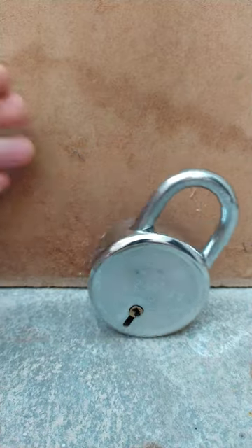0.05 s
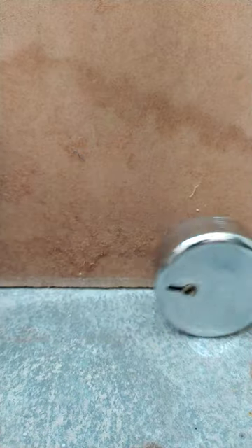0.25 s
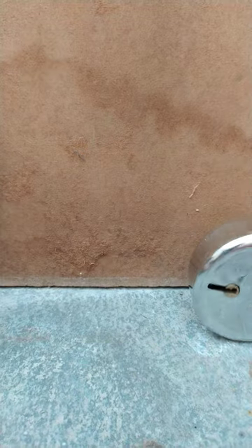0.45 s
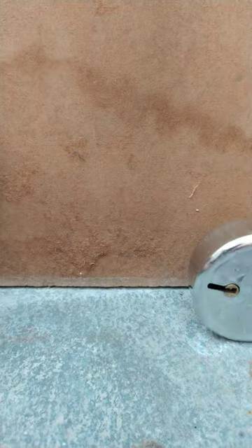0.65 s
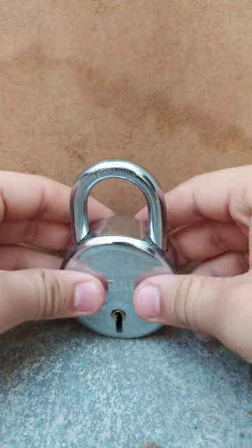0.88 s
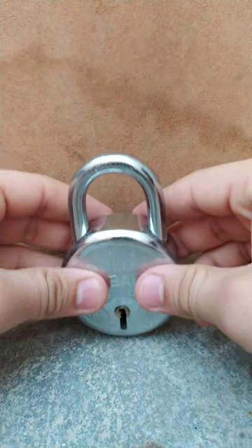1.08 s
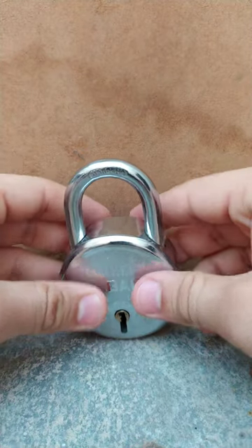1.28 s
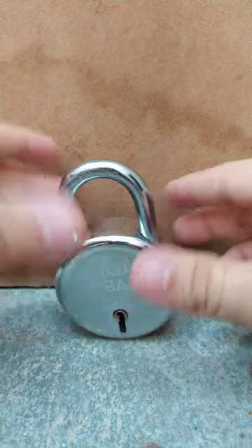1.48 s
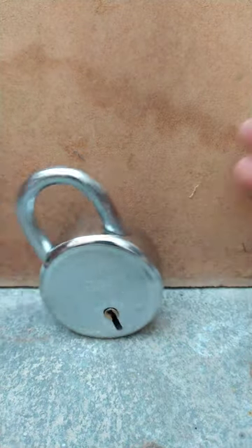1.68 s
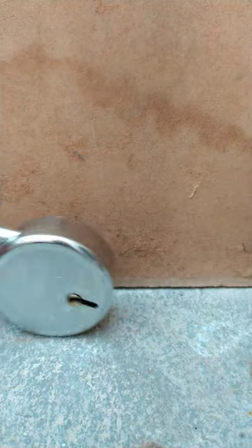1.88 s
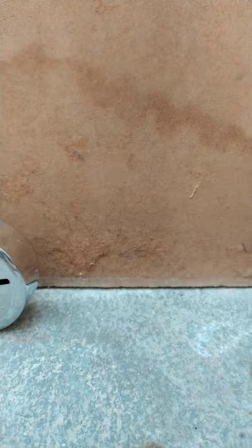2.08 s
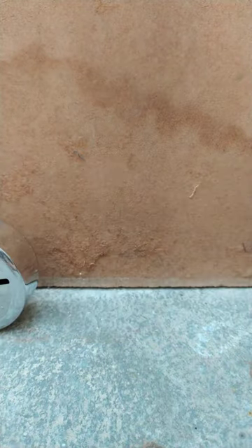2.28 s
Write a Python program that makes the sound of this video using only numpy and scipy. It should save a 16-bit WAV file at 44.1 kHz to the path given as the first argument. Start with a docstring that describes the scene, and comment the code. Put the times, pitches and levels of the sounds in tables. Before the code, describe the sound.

Metal padlock rolling on a stone slab, clacking, bouncing and rocking, close up.

```python
"""A round steel padlock is let go on a stone slab by a wall, close to the microphone.
It rolls over on its rim, and at 0.3 s its shackle (the steel loop) clacks down and bounces.
The lock rocks to rest, and at 1.2 s it is stood up with one firm knock.
From 1.8 s it rolls over again, and the shackle clacks down and bounces once more.
All along, a small hard room echoes over a quiet hiss and a low hum."""
import sys
import numpy as np
from scipy import signal
from scipy.fft import rfft, irfft, next_fast_len
from scipy.io import wavfile

SR = 44100
rng = np.random.default_rng(int(sys.argv[2]) if len(sys.argv) > 2 else 0)


def store_wav(level_fs):
    """Save 16-bit WAV to argv[1]."""
    pcm = np.round(np.clip(np.atleast_2d(level_fs), -1, 1) * 32767)
    wavfile.write(sys.argv[1], SR, pcm.T.astype(np.int16))


N = 108045
T = np.arange(N) / SR
FREE_TAIL_DB, HELD_TAIL_DB = -17.5, -28  # hands muffle the tail of a rattle

# hard blows of steel on stone (time [s], thud [dB], clack [dB], click [dB], steel ring [dB],
# rattle length [s], held in the hands [0 or 1], knock pitch [Hz], case pitch [Hz], boom [dB])
STRIKE_ROWS = [(0.3314, -28, -7.5, -3.5, -26, 0.0052, 0, 504, 1107, -8.5),
               (0.357, -15, -11, -6.5, -32.5, 0.0016, 0, 405, 1108, -18.5),
               (0.3658, -15, -14.5, -15.5, -58, 0.0032, 0, 357, 1105, -16.5),
               (1.1811, -13.5, -7.5, -8.5, -57, 0.0062, 1, 372, 1160, -28),
               (1.1842, -13, -16, -32, -33, 0.0021, 1, 309, 923, -9),
               (2.0256, -11, -11, -5, -21, 0.0076, 0, 600, 734, -23.5),
               (2.0556, -42, -20.5, -18.5, -30, 0.0077, 0, 414, 2090, -46),
               (2.0596, -13.5, -9, -28, -52, 0.0022, 0, 386, 667, -14),
               (2.076, -30, -21, -21, -42, 0.0059, 0, 320, 813, -30)]
COLUMNS = ["time", "thud", "clack", "click", "ring", "length", "held", "knock_hz", "case_hz", "boom"]
STRIKES = [dict(zip(COLUMNS, row)) for row in STRIKE_ROWS]
# soft bumps of rim and shackle (time [s], thud [dB], clack [dB], knock pitch [Hz], case pitch [Hz])
BUMP_ROWS = [(0.023, -36, -56, 376, 1130), (0.052, -29.5, -54, 520, 714), (0.134, -24.5, -46, 393, 716),
             (0.188, -19, -35.5, 391, 690), (0.214, -19, -38.5, 410, 700), (0.238, -22, -34, 365, 1000),
             (0.2698, -22, -44, 343, 620), (0.288, -35, -35.5, 342, 1130), (0.31, -20, -23, 386, 1044),
             (0.382, -21.5, -28, 367, 1000), (0.518, -22, -33, 374, 1045), (0.547, -26, -27, 384, 1026),
             (0.6166, -16, -16.5, 409, 990), (0.634, -20.5, -26.5, 384, 1120), (0.723, -19, -36, 402, 710),
             (0.744, -25, -28, 370, 1087), (0.8035, -19, -19.5, 353, 1153), (0.816, -23.5, -28, 498, 1050),
             (0.881, -19.5, -36, 337, 750), (0.897, -59, -28.5, 400, 1134), (1.615, -48, -48.5, 394, 1130),
             (1.669, -32.5, -55, 388, 570), (1.800, -28, -44, 432, 1125), (1.833, -30.5, -31, 572, 710),
             (1.891, -19, -34, 396, 697), (1.941, -18.5, -20, 377, 765), (1.954, -29, -37, 406, 980),
             (1.987, -28, -34.5, 310, 714), (2.089, -22.5, -29, 326, 645), (2.119, -31, -31.5, 366, 663),
             (2.15, -22, -41, 325, 680)]
BUMPS = [dict(zip(["time", "thud", "clack", "knock_hz", "case_hz"], row)) for row in BUMP_ROWS]
# notes of the lock on the slab (pitch [Hz])
THUD_PITCHES = [303, 322, 358, 452, 570, 668]
# how each of those notes rings (level [dB], time to fade by 60 dB [s])
THUD_FADES = [(-14, 0.31), (-4.5, 0.12), (-7.5, 0.077), (-20, 0.029), (-11, 0.12), (-11.5, 0.082)]
# deep notes of slab and wall (pitch [Hz], level [dB], fade time [s])
BOOM_NOTES = [(106.8, -20.5, 0.29), (153.9, -14.5, 0.14), (175.6, -21, 0.17)]
def thuds(rise_s=0.0015):
    """The lock's weight makes a hollow knock, pitched by where it lands; a faint boom follows."""
    hits = [(hit["time"], hit["thud"], hit["knock_hz"]) for hit in STRIKES + BUMPS]
    slab = convolve(taps(hits), ring(np.column_stack([THUD_PITCHES, THUD_FADES]), rise_s))
    knock = contact_notes(hits, fade_s=0.066, rise_s=rise_s)
    hollow = keep_band(slab + knock, "high", hz=250.6, order=4)
    pushes = [(hit["time"], hit["boom"]) for hit in STRIKES]
    pushes += [(hit["time"], hit["thud"] - 4) for hit in BUMPS]
    boom = convolve(taps(pushes), ring(BOOM_NOTES, rise_s=0.0048))
    return amp(-4) * hollow + boom


# notes of the lock's case (pitch [Hz])
CASE_PITCHES = [700, 931, 1066, 1182, 1890, 2413, 2647]
# how each of those notes rings (level [dB], fade time [s])
CASE_FADES = [(-1.5, 0.034), (-12.5, 0.039), (2, 0.013), (-5.5, 0.063), (-3.5, 0.035), (-6.5, 0.031),
              (-10, 0.038)]
# tone of the rattle when the lock is free (pitch [Hz], level [dB])
FREE_CLACK_TONE = [(150, -10), (600, -3.5), (1150, -1.5), (1450, -3), (1900, -3.5), (2700, 0.5),
                   (3300, -37), (4100, -10), (6000, -64.5)]
# its tone when hands muffle the lock (pitch [Hz], level [dB])
HELD_CLACK_TONE = [(150, -51), (450, -9), (670, 12), (800, 0.5), (930, 1), (1190, 8), (1420, -21.5),
                   (2150, -16.5), (2900, -9.5), (3500, -45), (6000, -53)]
# its duller tone after a soft bump (pitch [Hz], level [dB])
BUMP_TONE = [(150, -33), (600, -1), (1100, 2.5), (1450, -9.5), (1900, -8.5), (2700, -9), (3200, -27.5),
             (4100, -22), (6000, -44), (11000, -73)]
def clacks(rise_s=0.0031, firm_db=-21.5, bump_s=0.0018, spread=0.3):
    """The case and its loose parts knock and rattle, each contact with its own note."""
    hits = [(hit["time"], hit["clack"], hit["case_hz"]) for hit in STRIKES + BUMPS]
    notes = convolve(taps(hits), ring(np.column_stack([CASE_PITCHES, CASE_FADES]), rise_s))
    notes += amp(7.5) * contact_notes(hits, fade_s=0.045, rise_s=rise_s)
    free, held = strikes("clack", held=False), strikes("clack", held=True)
    # the rattle of a weak bump is lifted part of the way toward that of a firm one
    soft = [(hit["time"], hit["clack"] - 0.43 * min(hit["clack"] - firm_db, 0), bump_s) for hit in BUMPS]
    rattles = shape_tone(rattle(free, spread, FREE_TAIL_DB), FREE_CLACK_TONE)
    rattles += shape_tone(rattle(held, spread, HELD_TAIL_DB), HELD_CLACK_TONE)
    rattles += shape_tone(rattle(soft, spread, FREE_TAIL_DB), BUMP_TONE)
    return keep_band(amp(-7) * notes + amp(-2) * rattles, "high", hz=258)


# tiny ticks of grit and loose parts (time [s], level [dB])
GRIT_TICKS = [(0.313, -38), (0.5163, -27), (0.596, -43.5), (0.617, -39), (0.900, -38), (1.613, -44.5),
              (1.9, -34), (1.945, -35.5)]
# tone of the crack when the lock is free (pitch [Hz], level [dB])
FREE_CLICK_TONE = [(1500, -14.5), (3400, -11.5), (4100, -18.5), (4700, -18), (5800, -6), (6600, -8.5),
                   (8000, 0.5), (9200, 2), (10400, -22), (12000, -18), (14800, -16), (16000, -46)]
# its tone when the lock is held (pitch [Hz], level [dB])
HELD_CLICK_TONE = [(1500, -9), (3500, -20), (4050, -8), (4650, -22), (5200, -9), (6100, -6), (6600, -16),
                   (7250, -1), (8600, -3), (9400, -13), (10600, -21.5), (13500, -24), (15500, -48)]
# high notes of the steel body (pitch [Hz], level [dB], fade time [s])
STEEL_NOTES = [(5610, -2, 0.035), (8630, -40.5, .035), (7700, -15, 0.11), (9300, -24, 0.038),
               (8850, -14, 0.046), (9140, -0.5, 0.11)]
def clicks(tick_s=0.0044, spread=0.4):
    """Steel meets stone with a bright crack, and the body rings briefly."""
    free, held = strikes("click", held=False), strikes("click", held=True)
    ticks = [(time, db, tick_s) for time, db in GRIT_TICKS]
    crack = shape_tone(rattle(free + ticks, spread, FREE_TAIL_DB), FREE_CLICK_TONE)
    crack += shape_tone(rattle(held, spread, HELD_TAIL_DB), HELD_CLICK_TONE)
    body = convolve(taps([(hit["time"], hit["ring"]) for hit in STRIKES]), ring(STEEL_NOTES))
    return amp(-5.5) * crack + body


# moments when the shackle is off the stone (time [s], length [s], level [dB])
SHACKLE_BOUNCES = [(0.363, .044, -26), (2.032, .028, -32), (2.062, .034, -29)]
# notes of the shackle (pitch [Hz], level [dB], fade time [s])
SHACKLE_NOTES = [(7014, 0, .12), (9120, -4, .15), (9560, -10, .09), (11670, -8, .13), (12050, -13, .1),
                 (13150, 0, .3), (13260, -8, .1), (14520, -15, .06)]
def shackle(stop_s=0.0014):
    """The bouncing shackle rings thinly until it lies on the stone again."""
    out, notes = np.zeros(N), ring(SHACKLE_NOTES, rise_s=0.011)
    for time, length, db in SHACKLE_BOUNCES:
        since_landing = np.maximum(T[:len(notes)] - length, 0)
        add(out, time, amp(db) * notes * np.exp(-since_landing / stop_s))
    return out


# how loudly the rim rolls (time [s], level [dB])
ROLL_LEVELS = [(0, -50), (0.18, -49.5), (0.22, -32), (0.32, -28), (0.40, -36.5), (0.45, -47.5), (0.9, -53),
               (1.74, -59.5), (1.81, -38), (1.93, -42), (1.97, -34.5), (2.1, -26.5), (2.18, -39.5),
               (2.21, -57.5)]
# tone of the rolling (pitch [Hz], level [dB])
ROLL_TONE = [(100, -34), (230, -36), (315, 4.5), (400, -4), (500, -10), (690, -10.5), (920, -32),
             (1140, -20), (1450, -50.5), (2700, -43), (9000, -71.5)]
def rolling(roughness=0.63):
    """The rim runs over the grain of the stone: countless small uneven pushes."""
    grains = unit(noise(spread=0.035) * np.exp(roughness * rng.standard_normal(N)))
    loudness = amp(np.interp(T, *np.array(ROLL_LEVELS).T))
    return shape_tone(grains * loudness, ROLL_TONE)


# faint swishes (peak time [s], half length [s], pitch [Hz], width [relative to pitch], level [dB])
SLIDES = [(0.483, 0.027, 5500, 0.19, -47.5), (0.563, 0.072, 4260, 0.18, -53),
          (0.785, 0.081, 8160, 0.32, -53), (0.924, 0.016, 8300, 0.17, -41), (0.948, 0.061, 3630, 1, -51.5),
          (0.95, 0.14, 1127, 0.27, -46.5), (0.967, 0.058, 8250, 0.16, -48), (1.896, 0.026, 5300, 0.26, -49),
          (1.978, 0.053, 4700, 0.53, -52)]
def swishes():
    """Hiss swells softly as the lock slides and is handled."""
    out = np.zeros((2, N))
    slopes = [(-4, -70), (-2, -30), (-.5, 0), (.5, 0), (2, -30), (4, -70)]  # (offset [widths], [dB])
    for time, half, hz, width, db in SLIDES:
        band = [(hz * np.exp(offset * width), level) for offset, level in slopes]
        swell = amp(db) * np.exp(-((T - time) / half) ** 2)
        out += swell * shape_tone(noise(spread=1.0), band)
    return out


# how much louder the left side is than the right (pitch [Hz], level [dB])
LEFT_OVER_RIGHT = [(100, 1), (320, -1), (700, 5), (1200, 4), (2500, 3), (5000, -3), (8500, -2.5),
                   (14000, -1.5)]
def microphone(x, lag_s=0.00024, max_phase_rad=1.75):
    """The microphone's two openings hear the lock with different tone, the right one a little late."""
    size = next_fast_len(N + SR // 10)
    hz = np.arange(size // 2 + 1) * SR / size
    tilt = amp(level_at(LEFT_OVER_RIGHT, hz) / 2)
    phase = max_phase_rad * np.tanh(2 * np.pi * hz * lag_s / max_phase_rad)
    sides = np.array([tilt, np.exp(-1j * phase) / tilt])
    return irfft(rfft(x, size) * sides, size)[:, :N]


# tone of the room's echo (pitch [Hz], level [dB])
ECHO_TONE = [(60, 3.5), (110, 8.5), (220, 10), (305, 0), (400, -13.5), (520, -4.5), (900, 9), (1150, 5.5),
             (1600, 0), (3200, 3), (5000, 8), (9000, -0.5), (10500, -3.5), (15000, -8)]
def room(x, low_fade_s=0.75, high_fade_s=0.29, split_hz=2000, rise_s=0.0068):
    """A small hard room gives a smooth echo whose high sounds die first."""
    t, white = T[:SR], rng.standard_normal((2, SR))
    low = keep_band(white, "low", split_hz) * fade(t, low_fade_s)
    high = keep_band(white, "high", split_hz) * fade(t, high_fade_s)
    tail = (low - high) * rise(t, rise_s)
    tail /= np.sqrt(np.sum(tail ** 2) / 2)
    middle, side = shape_tone(convolve(x.mean(axis=0), tail), ECHO_TONE)
    return amp(-22) * widen(middle, side, above_hz=90)


# tone of the background hiss (pitch [Hz], level [dB])
HISS_TONE = [(20, -6.5), (40, -18.5), (62, -11.5), (100, -1.5), (125, -15.5), (170, -8), (250, -17.5),
             (305, -22), (400, -24.5), (520, -14), (670, -16), (900, -23.5), (1150, -18.5), (1500, -30),
             (2700, -33.5), (3500, -40.5), (5000, -43), (8800, -30.5), (10500, -44), (15000, -52.5)]
def background(hum_hz=38):
    """A quiet hiss lies over a low hum that wavers slightly in pitch."""
    drift = np.cumsum(rng.standard_normal(N)) / np.sqrt(SR)
    hum = np.sqrt(2) * np.sin(2 * np.pi * hum_hz * T + 3 * drift)
    middle, side = shape_tone(rng.standard_normal((2, N)), HISS_TONE)
    return amp(-47.5) * widen(middle, side, above_hz=600) + amp(-52) * hum


def strikes(sound, held):
    """(time, level, length) of one sound, for the held or the free blows."""
    return [(hit["time"], hit[sound], hit["length"]) for hit in STRIKES if hit["held"] == held]


def rattle(hits, spread, tail_db, rise_s=0.00039, tail_s=0.018):
    """Each hit is a burst of tiny impacts, with a short tail from slab and wall."""
    power, t = np.zeros(N), T[:SR // 5]
    for time, db, length in hits:
        fall = np.exp(-(t / length) ** 2) + amp(tail_db) * np.exp(-t / tail_s)
        add(power, time, (amp(db) * rise(t, rise_s) * fall) ** 2)
    return np.sqrt(power) * noise(spread)


def contact_notes(hits, fade_s, rise_s):
    """Each point of contact brings out one short note."""
    out = np.zeros(N)
    for time, db, hz in hits:
        add(out, time, ring([(hz, db, fade_s)], rise_s))
    return out


def ring(notes, rise_s=1 / SR):
    """Pure notes build up and die away after one blow."""
    t = T[:SR // 2]
    waves = sum(amp(db) * np.sin(2 * np.pi * hz * t) * fade(t, fade_s) for hz, db, fade_s in notes)
    return rise(t, rise_s) * waves


def taps(hits):
    """One sharp push for each hit."""
    out = np.zeros(N)
    for time, db, *_ in hits:
        add(out, time, amp([db]))
    return out


def noise(spread):
    """Stereo noise; more spread makes left and right less alike."""
    middle, side = rng.standard_normal((2, N))
    return unit(middle + spread * side * np.array([[1], [-1]]))


def widen(middle, side, above_hz):
    """Left and right, alike in the bass and unrelated higher up."""
    side = keep_band(side, "high", above_hz, order=1)
    return np.array([middle + side, middle - side]) / np.sqrt(2)


def shape_tone(x, tone):
    """Turn pitches up or down by a tone table; white noise keeps its power."""
    size = 2 ** 17
    gain = unit(amp(level_at(tone, np.arange(size // 2 + 1) * SR / size)))
    # fold the filter so that nothing sounds before the blow that causes it
    folded = irfft(np.log(gain))
    folded[1:size // 2] *= 2
    folded[size // 2 + 1:] = 0
    return irfft(rfft(x, size) * np.exp(rfft(folded)))[..., :N]


def level_at(tone, hz):
    """Read between the rows of a tone table, with octaves evenly spaced."""
    pitches, levels = np.array(tone, float).T
    return np.interp(np.log(np.maximum(hz, 1)), np.log(pitches), levels)


def keep_band(x, band, hz, order=2):
    return signal.sosfilt(signal.butter(order, hz, band, fs=SR, output="sos"), x)


def convolve(x, response):
    """Let every sample of x set off the response."""
    return signal.fftconvolve(np.atleast_2d(x), np.atleast_2d(response), axes=1)[:, :N]


def add(out, time, x):
    start = int(time * SR)
    out[..., start:start + x.shape[-1]] += x[..., :N - start]


def rise(t, rise_s):
    return 1 - np.exp(-t / rise_s)


def fade(t, fade_s):
    """Fall by 60 dB in fade_s seconds."""
    return np.exp(-np.log(1000) * t / fade_s)


def amp(db):
    return 10 ** (np.asarray(db) / 20)


def unit(x):
    return x / np.sqrt(np.mean(x ** 2))


def scene():
    """The lock up close, its echo, the swishes and the background."""
    lock = thuds() + clacks() + clicks() + shackle() + rolling()
    return microphone(lock) + room(lock) + swishes() + background()


def record(dry, top_hz=15800):
    """Clip peaks at full scale and cut the very highest sounds."""
    top_cut = signal.ellip(8, .2, 80, top_hz, fs=SR, output="sos")
    return signal.sosfilt(top_cut, np.clip(dry, -1, 1))


dry = scene()
out = record(dry)
store_wav(out)
```